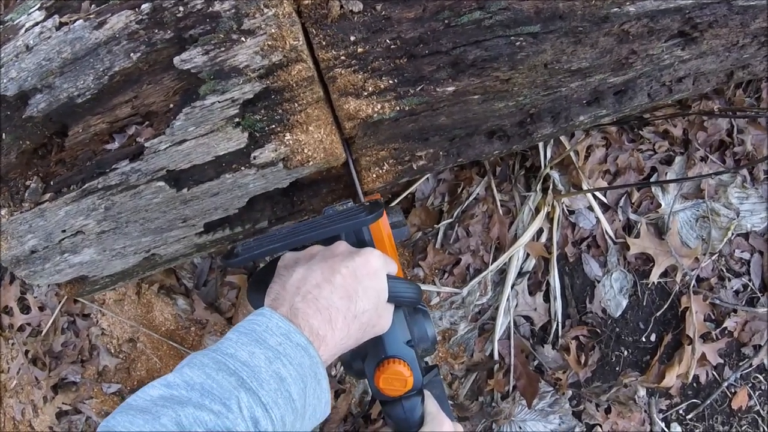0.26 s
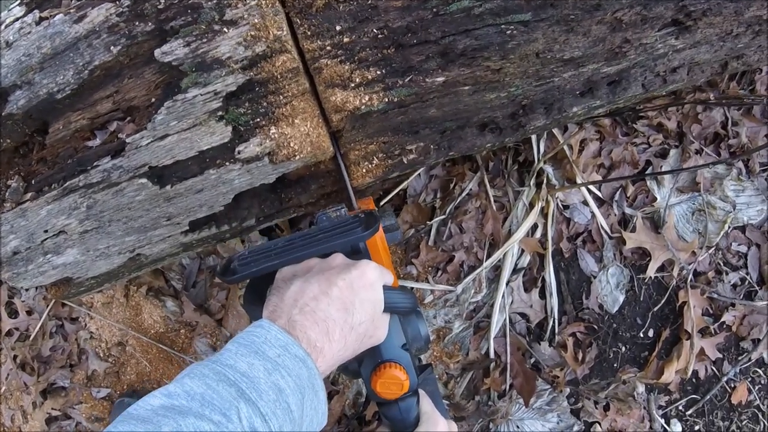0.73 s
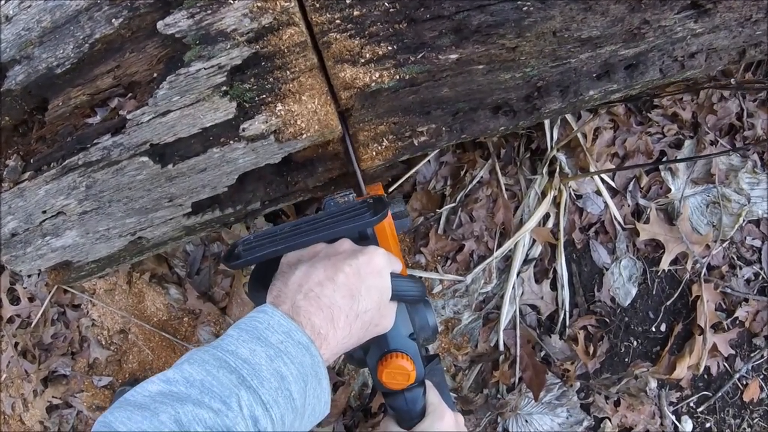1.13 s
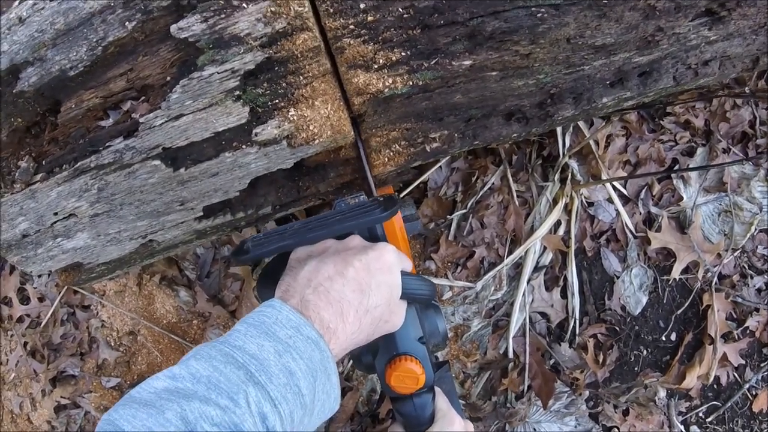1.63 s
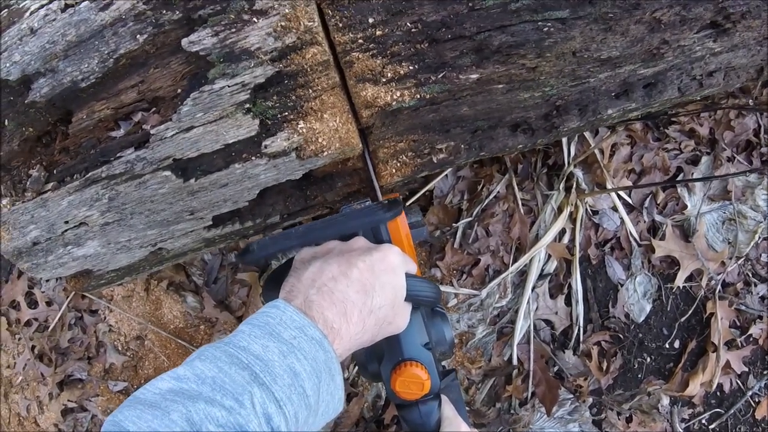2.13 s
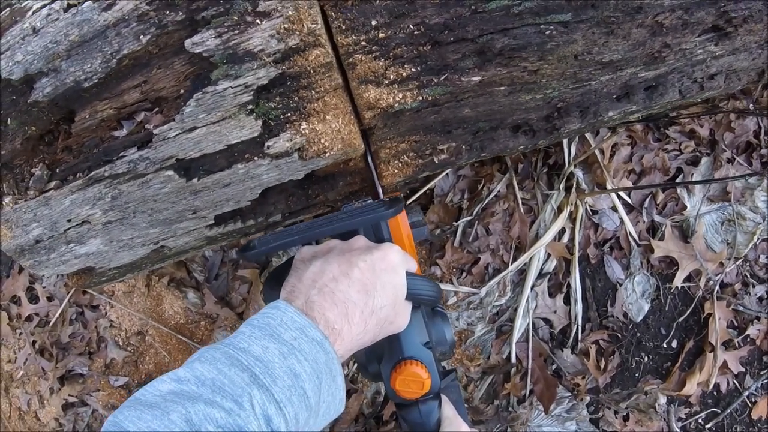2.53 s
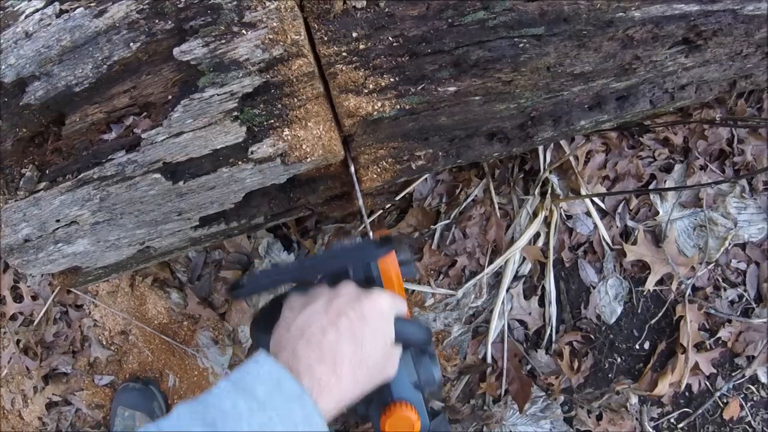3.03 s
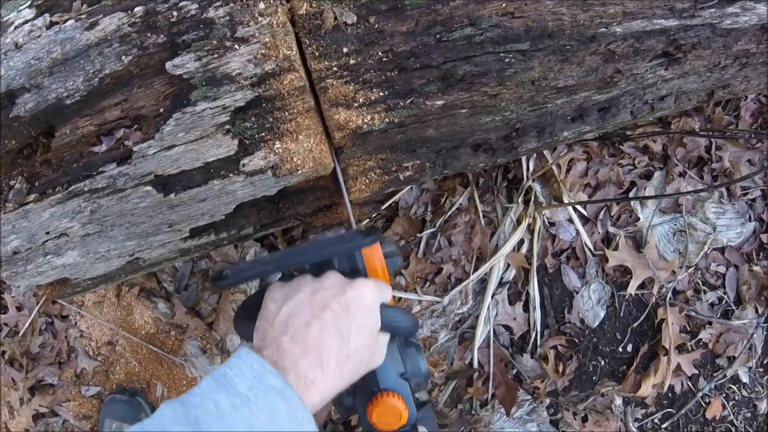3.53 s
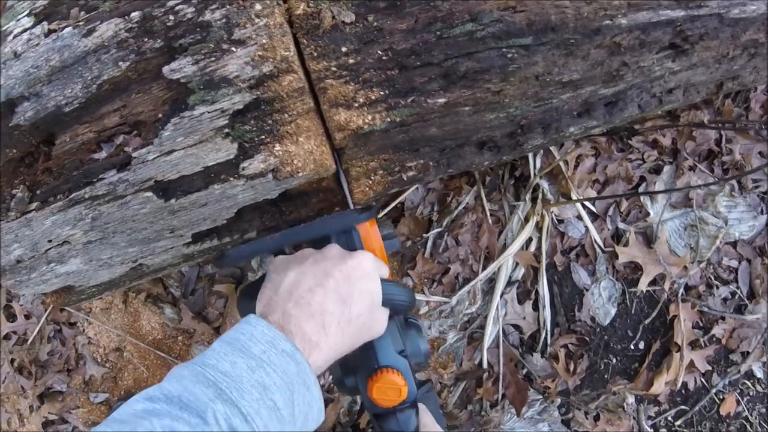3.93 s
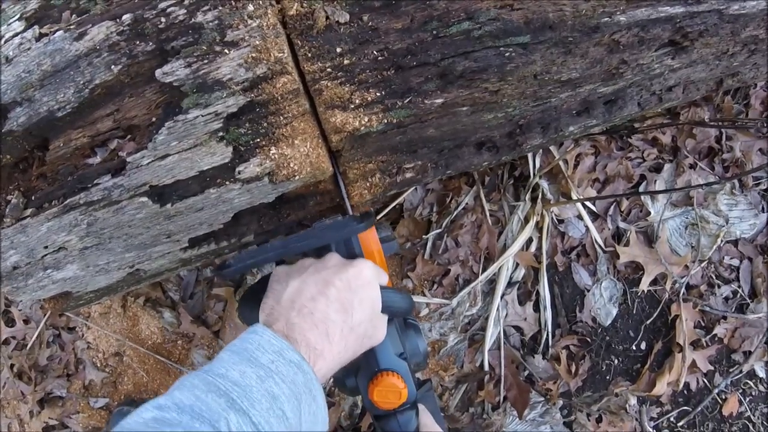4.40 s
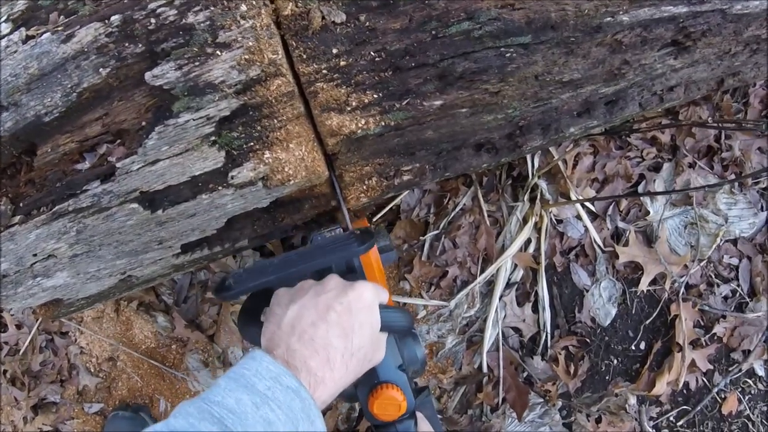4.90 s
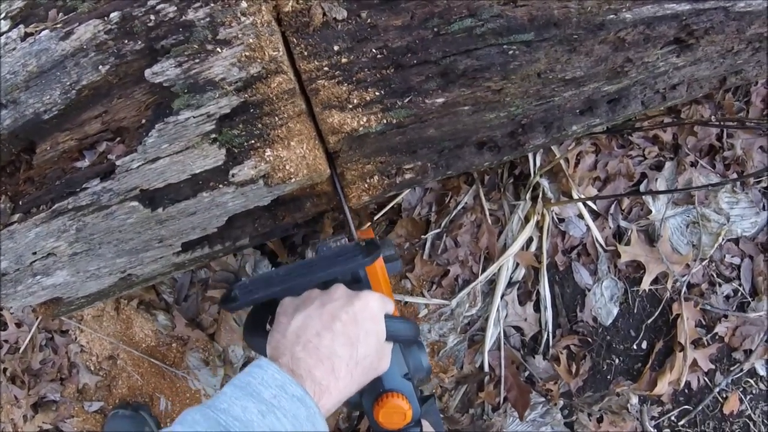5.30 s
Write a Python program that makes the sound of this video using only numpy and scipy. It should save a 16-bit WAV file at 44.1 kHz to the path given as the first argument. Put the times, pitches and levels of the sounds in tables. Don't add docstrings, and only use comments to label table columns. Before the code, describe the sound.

Close, loud electric chainsaw cutting wood outdoors: a bogging gear whine over rattling roar, abrupt stop, trigger clicks, then renewed surging cuts.

```python
import sys
import numpy as np
from scipy import signal
from scipy.fft import rfft, irfft, next_fast_len
from scipy.io import wavfile
from scipy.ndimage import uniform_filter1d, map_coordinates

SR = 44100
rng = np.random.default_rng(int(sys.argv[2]) if len(sys.argv) > 2 else 0)


def generate_wav(sig):
    pcm = np.round(np.clip(np.atleast_2d(sig).T, -1, 1) * 32767).astype(np.int16)
    wavfile.write(sys.argv[1], SR, pcm)


def elevation(decibels):
    levels = np.asarray(decibels, float)
    return 10 ** (levels / 20)


N = 244736

WHINE_ORDERS = [11, 22, 33, 48, 66, 96]
# frequency in Hz, density in dB per Hz.
HOUSING = [(65, -42), (110, -30), (171, -20.5), (577, -15), (801, -12), (1150, -9.5), (1830, -12.5),
           (2020, -17.5), (2270, -12.5), (4280, -13.5), (4720, -4), (5400, 0.5), (8090, -13.5), (9440, -15),
           (11000, -30), (14300, -77), (22000, -120)]
RELEASE_S, SQUEEZE_S = 2.53, 3.295
ROCKING_S = 3.9


def unit(x):
    return x / np.sqrt(np.mean(x ** 2) + 1e-20)


def along(points, hz):
    f, v = np.transpose(points)
    return np.interp(np.log(hz + 1), np.log(f + 1), v)


def curves(rows):
    s, *cols = np.transpose(rows)
    return np.array([np.interp(np.arange(N) / SR, s, c) for c in cols])


def wobble(knots_per_s):
    coarse = np.arange(0, N + 16, 16)
    knots = rng.standard_normal(int(N * knots_per_s / SR) + 4)
    return np.interp(np.arange(N), coarse, map_coordinates(knots, [coarse * knots_per_s / SR]))


def filtered(x, response):
    m = next_fast_len(N + SR // 2)
    return irfft(rfft(x, m) * response(np.fft.rfftfreq(m, 1 / SR)), m)[..., :N]


def below(hz, edge_hz):
    return 1 / (1 + (hz / edge_hz) ** 16)


def peaks_db(parts, hz):
    return sum(db / (1 + (2 * (hz - c) / w) ** 2) for c, w, db in parts)


def swells(rows, rest_db):
    t = np.arange(N) / SR
    power = elevation(2 * rest_db)
    for s, spread_s, db in rows:
        power = power + elevation(2 * db) * np.exp(-((t - s) / spread_s) ** 2)
    return np.sqrt(power)


def wind():
    # frequency in Hz, density in dB per Hz.
    buffet = [(8.8, -27), (15, -7), (38, -3), (59, -6), (91, -6.5), (114, -21.5), (171, -16), (300, -35),
              (390, -53.5), (660, -120)]
    # centre in seconds, spread in seconds, level in dB.
    gusts = [(.1, 0.49, -49), (2.1, 0.42, -51.5), (3.4, .55, -47), (4.37, 0.36, -45)]
    hum = [(86, 12, 6)]
    rumble = filtered(rng.standard_normal(N), lambda f: elevation(along(buffet, f) + peaks_db(hum, f)))
    return elevation(-1) * swells(gusts, -51) * unit(rumble)


def leaves():
    # frequency in Hz, density in dB per Hz.
    litter = [(120, -42.5), (200, -9), (325, -10), (425, -4.5), (615, -8.5), (1290, -9.5), (1380, -8.5),
              (3830, -21.5), (5180, 0), (9630, -18.5), (11000, -44), (14300, -56), (22000, -120)]
    # centre in seconds, spread in seconds, level in dB.
    shuffles = [(2.8, 0.046, -48), (2.98, 0.012, -52), (3.15, 0.045, -57), (3.21, 0.016, -69),
                (3.3, .02, -61)]
    # centre in seconds, spread in seconds, level in dB.
    crackles = [(2.775, 0.053, -52), (2.94, .02, -69), (3.08, 0.041, -55), (3.22, .02, -59),
                (3.3, 0.021, -66)]
    # shuffle, crackle [dB].
    still_db = [-60, -63]
    split_hz = 3500
    grains = rng.standard_normal((2, N)) * elevation(2.8 * wobble(200) + 3.3 * wobble(46))
    shuffle = filtered(grains[0], lambda f: elevation(along(litter, f)) * below(f, split_hz))
    crackle = filtered(grains[1], lambda f: elevation(along(litter, f)) * (1 - below(f, split_hz)))
    return swells(shuffles, still_db[0]) * unit(shuffle) + swells(crackles, still_db[1]) * unit(crackle)


def clicks():
    # start in seconds, peak level in dB, knock over snap in dB, 60 dB decay in seconds.
    hits = [(2.861, -48, 1, .035), (2.959, -43.5, 3, 0.02), (2.97, -46, 5, .035), (2.989, -14.5, -8, 0.027),
            (3.045, -30, -27, 0.02), (3.073, -45, -7, .035), (3.111, -44, -5, .035),
            (3.133, -32, -11, 0.031), (3.151, -13.5, -15.5, 0.024), (3.311, -42, 0, 0.041),
            (3.336, -52, 20, 0.038)]
    out, t = np.zeros(N), np.arange(2048) / SR
    snap_band = signal.butter(2, [4400, 8500], "band", fs=SR)
    knock_band = signal.butter(2, [800, 2800], "band", fs=SR)
    for s, db, knock_db, t60_s in hits:
        noise = rng.standard_normal((2, len(t)))
        snap = unit(signal.lfilter(*snap_band, noise[0]))
        knock = unit(signal.lfilter(*knock_band, noise[1]))
        fade = elevation(-60 * t / np.clip(t60_s, .004, .035))
        out[round(s * SR):][:len(t)] += elevation(db - 14) * fade * (snap + elevation(knock_db + 12.0) * knock)
    return out


def bump():
    t = np.arange(N) / SR - 3.892
    push = rng.standard_normal(N) * (t > 0) * elevation(-60 * np.abs(t) / 0.062)
    return elevation(-14) * filtered(push, lambda f: 4 * below(f, 1200) / np.sqrt(1 + f / 250))


def worn(turns):
    wear = rng.standard_normal((60, 600))
    return unit(map_coordinates(wear, [np.arange(N) / SR * 6, turns % 1 * 599], order=1))


def bar(turns, bar_db):
    drive = worn(turns) + 0.84 * rng.standard_normal(N)
    ring = filtered(drive, lambda f: 1 / (1 + ((f - 2285) / 70) ** 2))
    return elevation(bar_db) * unit(ring)


def panels_db(hz):
    # frequency in Hz, width in Hz, gain in dB.
    panels = [(1530, 200, 4.5), (1756, 79, 4), (2184, 150, 7), (2796, 23, 9.5), (4900, 980, 2.5),
              (5523, 290, 3.5), (7300, 290, -1)]
    return peaks_db(panels, hz)


def knocks(turns, shriek_db):
    force = np.clip(.09 * (shriek_db + 22) + .3 * wobble(7), 0, 1)
    blow = np.exp(3 * np.cos(2 * np.pi * turns + .4 * wobble(20)) - 3)
    return (1 + 1.15 * force * blow) / (1 + .35 * force)


def rattle(turns, levels, knock):
    edges_hz = [1200, 4300, 7000]
    beats = [(.4, 0.14), (1, 0.17), (3, .2), (6, 0.12), (7, 0.41), (8, 0.24), (11, 0.38)]
    low, mid, top = edges_hz
    shares = [lambda f: below(f, top) - below(f, mid),
              lambda f: below(f, low),
              lambda f: below(f, mid) - below(f, low),
              lambda f: 1 - below(f, top)]
    beat_depths, repeats = [0.79, 0.17, 0.3, 0.17], [0.43, 0.5, 0.68, 0.28]
    shared = np.clip(wobble(30), -2.5, 1.6)
    bands = []
    for share, beat, repeat in zip(shares, beat_depths, repeats):
        chatter = rng.standard_normal(N) * elevation(1.7 * np.clip(wobble(300), -3, 1.8))
        swell = 0
        for k, depth in beats:
            swell = swell + depth * np.cos(2 * np.pi * (k * turns + rng.random() + 0.034 * wobble(6)))
        drift_db = 1.07 * shared + 0.71 * np.clip(wobble(25), -2.5, 1.4)
        drive = (repeat * worn(turns) + unit(chatter)) * (1 + beat * swell) * elevation(drift_db)
        colour = lambda f: elevation(along(HOUSING, f) + panels_db(f)) * share(f)
        bands.append(unit(filtered(drive, colour)))
    bands[0] = unit(bands[0] * knock)
    bands[2] = unit(bands[2] * np.sqrt(knock))
    shriek_db, *rest_db = levels
    rest = sum(elevation(db) * band for db, band in zip(rest_db, bands[1:]))
    return elevation(shriek_db - 2.5) * (bands[0] + rest)


def controller():
    t = np.arange(N) / SR
    return elevation(-35.5 - 20 * ((t - 3.36) / 0.047) ** 2) * np.sin(2 * np.pi * 5000 * t)


def whine(turns, speed_hz, shriek_db, knock, tones_db):
    # cycles per turn, level over the rattle colour in dB.
    faint = [(44, -9), (55, -18), (77, -17.5), (144, -17.5)]
    # frequency in Hz, width in Hz, gain in dB.
    cover = [(5343, 310, 10)]
    swings_rad = [.45, 1.2, .3, .25, .45, .55, .3, .4, .6, .8]
    t = np.arange(N) / SR
    rocking = t > ROCKING_S
    faint_db = [db + along(HOUSING, k * speed_hz) + peaks_db(cover, k * speed_hz) + shriek_db
                for k, db in faint]
    orders = WHINE_ORDERS + [round(k) for k, _ in faint]
    loose = np.clip((58 - speed_hz) / 12, 0, 1)
    fade_db = 1.5 * loose - .9 * np.clip(30 - speed_hz, 0, 30)
    out = 0
    for k, swing_rad, db in zip(orders, swings_rad, [*tones_db, *faint_db]):
        spin = 2 * np.pi * (turns + rng.random())
        runout = swing_rad * (1 + .4 * wobble(8)) * np.where(rocking & (k == 22), .5, 1)
        jitter = .007 * k * (1 + 1.3 * (k > 60) * rocking) + 1.2 * loose
        slip = jitter * wobble(110) + runout * np.sin(spin)
        throb = 1 + .45 * np.cos(spin + wobble(5))
        if k > 60:
            throb = throb * knock * (1.2 - .7 * loose)
        flicker_db = fade_db + (2.6 + 4 * loose) * np.clip(wobble(45), -3, 1)
        level = np.sqrt(2) * elevation(db + flicker_db)
        out = out + level * throb * np.sin(2 * np.pi * k * turns + slip)
    return filtered(out, lambda f: elevation(0.054 * panels_db(f) - 0.75)) + controller()


def shaft():
    # time in seconds, shaft speed in Hz.
    deep_cut = [(0, 66), (.26, 70.4), (.55, 75.3), (1.16, 74.2), (1.447, 69.7), (1.66, 62.9), (1.985, 61.9),
                (2.31, 58.2), (2.52, 57.8)]
    # start in s, sag time in s, speed loss in Hz, hold in s, recovery in s.
    bites = [(.1, .085, 1, .01, .07), (.62, .2, 1.4, .01, .09), (1.165, .177, 3.2, .01, .095),
             (1.99, .125, 3, .09, .1), (3.836, .085, 2.8, 2, .1), (3.837, .084, 7.8, .06, .31),
             (4.262, .085, 10.4, .13, .157), (4.29, .06, 1.6, .02, .1), (4.65, .08, 7.4, .125, .12),
             (5.024, .079, 4.1, .105, .135), (5.343, .11, 4.5, .2, .1)]
    free_hz, brake_s, spin_up_s = 85.2, .096, .181
    t = np.arange(N) / SR
    sag_hz = sum(np.interp(t, np.cumsum([s, fall, hold, back]), [0, hz, hz, 0])
                 for s, fall, hz, hold, back in bites)
    sag_hz = uniform_filter1d(sag_hz, size=1300)
    bite = uniform_filter1d(np.roll(np.gradient(sag_hz), -500) * SR / 100, size=1800)
    first = t < (RELEASE_S + SQUEEZE_S) / 2
    working_hz = np.where(first, curves(deep_cut)[0], free_hz) - sag_hz
    braking = np.exp(-np.clip((t - RELEASE_S) / brake_s, 0, None) ** 1.5)
    rising = 1 - np.exp(-np.clip((t - SQUEEZE_S) / spin_up_s, 0, None) ** 1.9)
    speed_hz = np.maximum(working_hz * np.where(first, braking, rising), 1)
    return speed_hz, free_hz - working_hz, bite, 1 / working_hz


def saw():
    # time in seconds, level in dB.
    lean = [(0, -2), (.15, -0.1), (.5, -1.5), (.9, 0.6), (1.1, 0.5), (1.3, 2), (1.6, 1), (1.9, -1.9),
            (2.3, -2), (2.55, -1.2), (3.6, -0.5), (3.93, 1.5), (4.2, 0.6), (4.45, 1), (4.62, -0.5),
            (4.95, -1.7), (5.3, -2), (5.45, 1)]
    # free level in dB, dB per Hz of load, dB per bite, share of lean, stall slope in dB Hz.
    layers = [
        (-19.5, 0.1955, 2, 1, 264.5),
        (-30.5, 0.1518, 2.5, 0.76, 181),
        (-21, -0.2219, -0.2, 0.37, 190),
        (-34.5, -0.1333, 1.5, .2, 309),
    ]
    # level in dB, second cut in dB, its drift in dB per s, unloaded in dB, dB per bite.
    tones = [
        (-40, -1.5, -3.5, 8.5, .5),
        (-56.5, 3, -3.5, 3.5, -0.3),
        (-51, 5.5, -5.5, 0, 0.4),
        (-34.5, 3, -10.5, 3, 2.5),
        (-44, -7, 4.6, -4, 4.5),
        (-43, 1, -2.5, -1, 4),
    ]
    sweep_db = [-41, -44, -28, -29, -32, -36]
    # frequency in Hz, width in Hz, gain in dB.
    gear_case = [(714, 150, 4), (1740, 800, 22), (2030, 110, -9), (2353, 310, 13.5), (2805, 350, 22.5),
                 (4780, 950, 17), (5284, 486, 15.5)]
    # frequency in Hz, width in Hz, gain in dB.
    motor_vent = [(5563, 560, 22.5), (6050, 400, 18)]
    speed_hz, load_hz, bite, period_s = shaft()
    turns, t = np.cumsum(speed_hz) / SR, np.arange(N) / SR
    first = t < SQUEEZE_S
    sweep = np.clip(4 * (1 - speed_hz * period_s), 0, 1)
    stall_s = (period_s - 1 / speed_hz) * np.where(first, 1.35, 1)
    free = np.clip(1 - load_hz / 2, 0, 1)

    lean_db = curves(lean)[0]
    levels = np.array([db + grow * load_hz + dig * bite + share * lean_db + drop * stall_s
                       for db, grow, dig, share, drop in layers])
    levels[1] += -1.5 * free
    levels[1:] -= levels[0]

    second = (t > SQUEEZE_S) * (1 - free)
    tones_db = []
    for k, (db, again, drift, idle, dig), swept in zip(WHINE_ORDERS, tones, sweep_db):
        steady = db + (again + drift * (t - ROCKING_S)) * second + idle * free + dig * bite
        steady = steady + 16 * (k > 40) * np.minimum(bite, 0)
        steady = steady + peaks_db(motor_vent if k % 48 == 0 else gear_case, k * speed_hz)
        braked = swept - 6 * first
        tones_db.append(steady + sweep * (braked - steady) + 170 * stall_s)

    pinch_db = np.exp(-t / .6)
    bar_db = np.where(first, -31.5 + pinch_db + 240 * stall_s, -np.inf)
    knock = knocks(turns, levels[0])
    lines = whine(turns, speed_hz, levels[0], knock, tones_db)
    return lines + rattle(turns, levels, knock) + bar(turns, bar_db)


def scene():
    return (wind() + leaves() + clicks() + bump() + saw())[None]


def top_cut(x):
    return signal.sosfilt(signal.butter(12, 13900, fs=SR, output="sos"), x)


def record(dry):
    soft = dry[0] / (1 + np.abs(dry[0] / .85) ** 8) ** (1 / 8)
    return top_cut(soft)


dry = scene()
out = record(dry)
generate_wav(out)
```